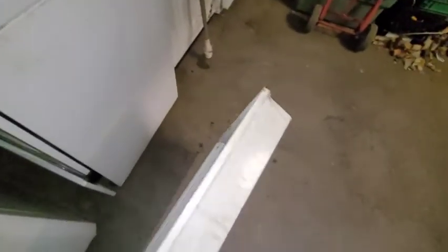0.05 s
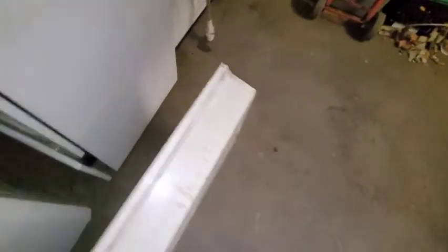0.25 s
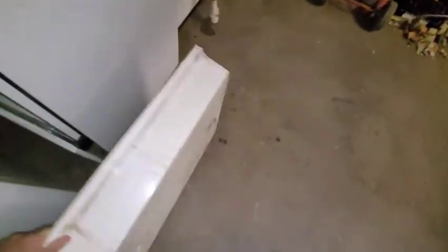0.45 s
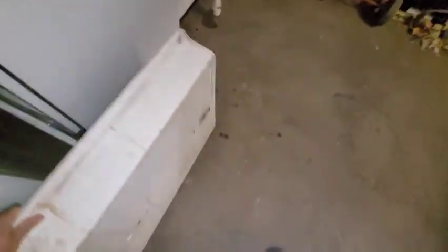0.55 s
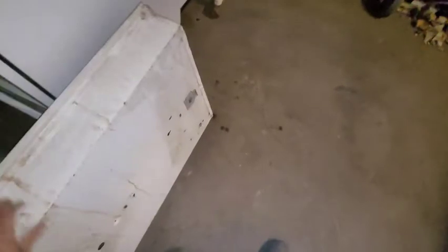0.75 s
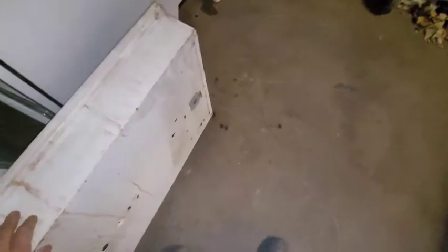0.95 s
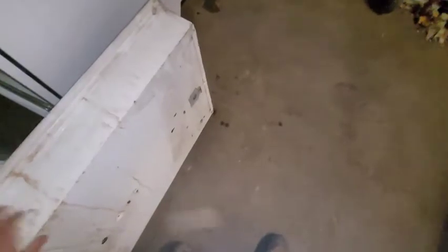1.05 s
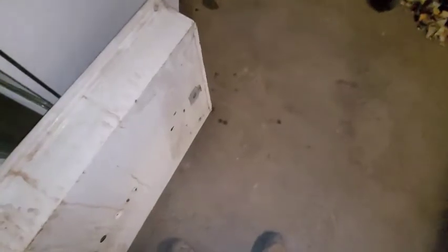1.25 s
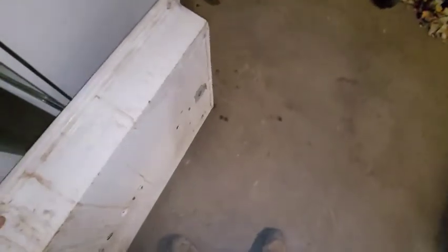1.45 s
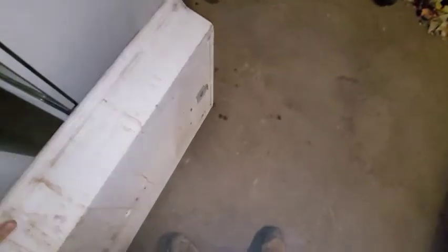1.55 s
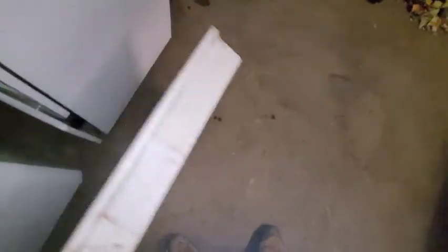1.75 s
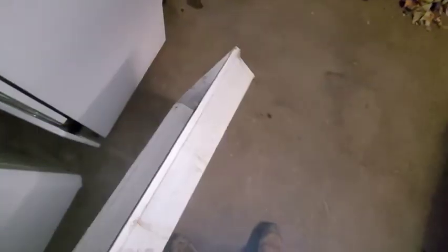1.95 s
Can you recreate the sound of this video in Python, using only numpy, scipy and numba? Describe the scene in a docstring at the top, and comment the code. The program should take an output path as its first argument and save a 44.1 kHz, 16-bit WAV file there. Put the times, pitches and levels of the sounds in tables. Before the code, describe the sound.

Close by in a reverberant garage, a big steel panel tips onto concrete with two loud, ringing bangs. Lighter knocks follow, then a thin metallic jingle, a gritty scrape and a last knock with a dull thump.

```python
"""Two loud, chattering bangs: a large folded sheet-steel panel tips onto a concrete garage floor nearby.
It rocks and knocks; each blow excites the bending modes of the sheet, which in turn fill the room.
A small loose metal part jingles, then the edge drags over grit and is knocked again, with one dull thump.
A gain control ducks the level under the big bangs."""
import sys
import numpy as np
from scipy import signal
from scipy.fft import rfft, irfft
from scipy.io import wavfile
from numba import njit

SR = 44100
rng = np.random.default_rng(int(sys.argv[2]) if len(sys.argv) > 2 else 0)


def wav_out(sig):
    """Save sig, one row per channel (or a flat mono array), as 16-bit PCM at SR to the path in sys.argv[1]."""
    wavfile.write(sys.argv[1], SR, np.round(np.clip(np.atleast_2d(sig).T, -1, 1) * 32767).astype(np.int16))


N = 88200
T = np.arange(N) / SR
FREQS = np.arange(N + 1) * SR / (2 * N)
GRIT_PER_S, GRIT_SCATTER_DB = 1500, 4.5
# Centres of the bands in which vibrational power is followed, in Hz.
BANDS_HZ = [40, 70, 140, 250, 420, 700, 1200, 2000, 3300, 5000, 8000, 13000, 16000]


def undb(db):
    """Decibels to amplitude ratio."""
    return 10 ** (np.asarray(db) / 20)


def at(points, hz):
    """Interpolation of (Hz, value) points on a log-frequency axis."""
    f, v = np.array(points, float).T
    return np.interp(np.log(np.maximum(hz, 1)), np.log(f), v)


def unit(x):
    """Normalisation to unit energy."""
    return x / np.sqrt(np.sum(x ** 2, axis=-1, keepdims=True) + 1e-18)


def convolve(x, response):
    """Convolution: x drives a linear system with this impulse response."""
    return irfft(rfft(x, 2 * N) * rfft(response, 2 * N))[..., :N]


def colour(x, points):
    """Minimum-phase filtering through (Hz, dB) points."""
    cepstrum = irfft(np.log(undb(at(points, FREQS))))[:N]
    cepstrum[1:] *= 2
    return irfft(rfft(x, 2 * N) * np.exp(rfft(cepstrum, 2 * N)))[..., :N]


def delay(x, s):
    """Pure delay of s seconds."""
    k = int(np.clip(s * SR, 0, N - 1))
    return np.concatenate([np.zeros(k), x[:N - k]])


def ring(modes):
    """Free vibration: a sum of damped sines, each of random sign."""
    signs = rng.choice([-1, 1], len(modes))
    return sum(sign * undb(db) * np.exp(-np.log(1000) * T / t60) * np.sin(2 * np.pi * hz * T)
               for sign, (hz, db, t60) in zip(signs, modes))


def clicks(per_s, scatter_db):
    """Poisson process: random contacts of uneven size, at rms 1."""
    impulses = (rng.random(N) < per_s / SR) * rng.choice([-1, 1], N)
    return unit(impulses * undb(scatter_db * rng.standard_normal(N))) * np.sqrt(N)


def store(power, t60):
    """Leaky integration: a resonator loses its stored energy exponentially."""
    retained = np.exp(-2 * np.log(1000) / (max(t60, .005) * SR))
    return signal.lfilter([1 - retained], [1, -retained], power)


def wash(power, t60s, echo_db):
    """Statistical energy flow: in each band, power feeds an object's dense modes, which feed the room."""
    # Garage reverberation. Each row: frequency in Hz, T60 in seconds.
    room_t60 = [(70, 1.44), (250, 1.24), (700, 1.19), (2000, 0.68), (6000, 0.23), (15000, 0.58)]
    # Likeness of the two channels. Each row: frequency in Hz, correlation.
    coherence = [(50, 0.28), (130, 1), (280, 1), (520, 1), (1000, 0.0082), (15000, 0.0081)]
    room_db = -1
    alike = np.clip(at(coherence, FREQS[::2]), 0, 1)
    mid, side = rfft(rng.standard_normal((2, N))) * np.sqrt(np.array([1 + alike, 1 - alike]) / 2)
    field, out = np.array([mid + side, mid - side]), 0
    for hz, share, fed in zip(BANDS_HZ, np.eye(len(BANDS_HZ)), power):
        own = store(fed + 1e-18, at(t60s, hz))
        echo = store(own, at(room_t60, hz)) * undb(room_db + at(echo_db, hz)) ** 2
        band_noise = irfft(field * at(list(zip(BANDS_HZ, share)), FREQS[::2]))
        out = out + band_noise * np.sqrt((own + echo) / 2)
    return out


def room_air(rms_db=-67.5):
    """Ambient noise: steady, strongest in the bass, uncorrelated between channels."""
    # Each row: frequency in Hz, relative level in dB.
    spectrum = [(30, -2), (120, -10), (400, -1), (900, -13), (2500, -19), (8000, -21), (15000, -19)]
    return unit(colour(rng.standard_normal((2, N)), spectrum)) * np.sqrt(N) * undb(rms_db)


def thump():
    """Heavy damping: a low oscillation dies within a few cycles."""
    # Each row: start in seconds, frequency in Hz, time constant in seconds, level in dB.
    pulses = [(1.896, 86, 0.0088, -24.5)]
    return sum(delay(undb(db) * np.sin(2 * np.pi * hz * T) * np.exp(-T / decay_s), s)
               for s, hz, decay_s, db in pulses)


def skids():
    """Sliding friction: the edge skids over grit in brief swells of hiss."""
    # Each row: start in seconds, length in seconds, level in dB.
    slides = [(0.531, 0.23, -40), (1.673, 0.081, -45.5)]
    # Each row: frequency in Hz, gain in dB.
    spectrum = [(3000, -14), (7000, -4), (12000, 4.5), (15500, 16)]
    swell = sum(undb(db) * np.sin(np.pi * np.clip((T - s) / length, 0, 1)) for s, length, db in slides)
    grit = np.array([clicks(GRIT_PER_S, GRIT_SCATTER_DB) for _ in range(2)])
    return swell * colour(grit, spectrum)


def loose_part(crack_db=-8.5, crack_decay_s=.006):
    """Impulse excitation: sharp ticks ring the high modes of a small piece of metal."""
    # Each row: start in seconds, level in dB.
    ticks = [(1.09, -20), (1.226, -19), (1.304, 1.5), (1.31, -2.5), (1.322, 3), (1.341, 2.5), (1.447, 5),
             (1.758, -4.5)]
    # Each row: frequency in Hz, level in dB, T60 in seconds.
    modes = [(10540, -50, .08), (11828, -39, .12), (14443, -36, .13), (15513, -25, .11)]
    # Spectrum of a tick. Each row: frequency in Hz, gain in dB.
    spectrum = [(500, -16.5), (1500, -5), (3000, -13), (5000, -3.5), (9000, -8.5), (15000, 9)]
    # Decay of the dense modes. Each row: frequency in Hz, T60 in seconds.
    t60s = [(2000, 0.26), (6000, 0.32), (14000, 0.14)]
    # Coupling to the room. Each row: frequency in Hz, gain in dB.
    echo_db = [(2000, 4), (6000, 3.5), (14000, -13.5)]
    strikes = sum(delay(undb(db) * (T == 0), s) for s, db in ticks)
    power = np.outer(undb(at(spectrum, BANDS_HZ)), strikes) ** 2
    burst = unit(rng.standard_normal((2, N)) * np.exp(-T / crack_decay_s))
    crack = colour(burst, spectrum) * undb(crack_db)
    return wash(power, t60s, echo_db) + convolve(strikes, crack + ring(modes))


def flange(detune=.006):
    """Modal ringing: the folded flange clanks as a corner lands, at slightly new pitches each time."""
    # Each row: start in seconds, level in dB.
    landings = [(.740, -0.5), (0.784, -5), (1.762, -9)]
    # Each row: frequency in Hz, level in dB, T60 in seconds.
    modes = [(1390, -32, .3), (1600, -30, .35), (2400, -30, .25), (2470, -26, .35), (2560, -31, .25),
             (2750, -29, .3), (2930, -32, .55), (3140, -32, .45), (4830, -40, .4)]
    out = 0
    for s, db in landings:
        detuned = [(hz * (1 + detune * rng.standard_normal()), level, t60) for hz, level, t60 in modes]
        out = out + undb(db) * np.array([delay(ring(detuned), s) for _ in range(2)])
    return out


def drag():
    """Roughness excitation: grit catches under the moving edge; gives force and band power."""
    # Each row: time in seconds, relative level in dB.
    levels = [(0, -47), (.1, -27.5), (.21, -15.5), (.6, 3.5), (1.0, -18), (1.25, -19), (1.42, -2.5),
              (1.56, -1.5), (1.66, -2), (1.72, 2.5), (1.82, -6), (1.92, -5), (2, 0)]
    # Each row: frequency in Hz, gain in dB.
    spectrum = [(70, -54.5), (250, -60), (700, -60), (2000, -56), (4200, -55), (6800, -58.5), (9000, -50.5),
                (15000, -73)]
    grit = clicks(GRIT_PER_S, GRIT_SCATTER_DB) * undb(np.interp(T, *np.array(levels).T))
    return colour(grit, spectrum), np.outer(undb(at(spectrum, BANDS_HZ)), grit) ** 2


def blows(first_contact=1.12):
    """Impact: one hard contact, then a dying chatter of loose edges; gives force and band power."""
    # Each row: start in seconds, chatter time constant in seconds, then force in dB at each of force_hz.
    impacts = [(.225, 0.0023, 1, 0.5, -1.5, 2, 3, 4.5), (.252, .005, 2.5, 4.5, 4.5, 0, -4, 2),
               (.304, 0.0036, -9, 8, -1, -2, -1, 3.5), (0.382, 0.013, 2.5, -30, -3, 7.5, 7, 8.5),
               (.422, 0.025, 6, -13.5, 3.5, -19, -16, -18), (.658, 0.011, 4, -4.5, -7.5, -10.5, -17, -11.5),
               (.739, 0.0017, 0, -12, -10.5, -1, -5, -6), (.795, .005, -15, -3, -20.5, -23.5, -59, -21),
               (.854, 0.0024, -5, -15, -8.5, -5.5, -14.5, -6.5),
               (1.040, 0.0058, -14.5, -40, -29, -27, -42, -40),
               (1.446, 0.0029, -41, -28, -12.5, -9, -7, -7.5),
               (1.762, 0.0055, -21, -23.5, -23, -14, -12, -20.5),
               (1.992, .002, -23, -14.5, -14, -10, -13, -23.5)]
    force_hz = [70, 250, 700, 2000, 5000, 13000]
    force, power = np.zeros(N), 0
    for s, chatter_s, *force_db in impacts:
        fade = np.exp(-T / chatter_s) + 1e-12
        spectrum = list(zip(force_hz, force_db))
        contact = unit(clicks(per_s=860, scatter_db=7.5) * fade)
        contact[0] += first_contact
        force += delay(colour(unit(contact), spectrum), s)
        power = power + np.outer(undb(at(spectrum, BANDS_HZ)) ** 2, delay(unit(fade) ** 2, s))
    return force, power


def partials(mean_spacing_hz=54.4, t60_s=.51):
    """Modal density: many weak modes at random pitches, each with its own phase in each channel."""
    # Each row: frequency in Hz, gain in dB.
    spectrum = [(250, -33), (500, -3), (2000, -4.5), (7000, -6), (12000, -12)]
    bins = N // 2 + 1
    present = rng.random(bins) < SR / N / mean_spacing_hz
    tones = irfft(present * np.exp(2j * np.pi * rng.random((2, bins))))
    return colour(unit(tones * np.exp(-np.log(1000) * T / t60_s)), spectrum)


def panel(contact_db=-17.5):
    """Superposition: blows and drag drive the sheet's dense, weak and strong modes; blows also crack."""
    # Broad response of the sheet. Each row: frequency in Hz, gain in dB.
    response = [(25, 2), (48, 20.5), (72, 25), (110, 23), (135, 24.5), (170, 30), (210, 35.5), (255, 32.5),
                (380, 36), (520, 27), (740, 28.5), (1000, 20.5), (1450, 25), (2000, 22), (2500, 22),
                (3000, 19), (3600, 17.5), (6500, 17), (11000, 13.5), (15500, 24)]
    # Decay of the dense modes. Each row: frequency in Hz, T60 in seconds.
    t60s = [(70, 0.46), (250, 0.76), (700, 0.66), (2000, 0.71), (6000, 0.6), (15000, 0.28)]
    # Coupling to the room. Each row: frequency in Hz, gain in dB.
    echo_db = [(70, -4.5), (250, 2), (2000, -1), (6000, -2), (15000, -3.5)]
    # Each row: frequency in Hz, level in dB, T60 in seconds.
    strong_modes = [(72, -43, .9), (207, -21, .55), (226, -28, 2.0), (285, -27, .6), (360, -28, .75),
                    (410, -33, .8), (612, -38, .8), (715, -34, .9), (1160, -41, .6), (1290, -41, .6),
                    (1600, -41, .6), (1806, -42, .6), (2293, -38, .7), (2482, -39, .6), (2930, -42, .7),
                    (4452, -41, .6), (4958, -42, .6), (6444, -40, .7)]
    hits, hit_power = blows()
    grit, grit_power = drag()
    force = hits + grit
    dense = wash(hit_power + grit_power, t60s, echo_db)
    crash = undb(contact_db) * hits + dense + convolve(force, partials())
    return colour(crash, response) + convolve(force, ring(strong_modes))


def scene(right_lag_s=.00038):
    """Stereo localisation: time and level differences place the sources off centre, over room air."""
    # The panel swings across the microphone. Each row: time in seconds, left minus right in dB.
    swing = [(.22, -1.8), (.45, -0.5), (.8, -.5), (1.3, 0), (1.55, -1), (1.8, 0), (2, 0.5)]
    # Each row: frequency in Hz, left minus right in dB.
    balance = [(100, 1), (250, -0.5), (600, -1), (1200, -4.5), (2800, -1.5), (5500, -2.5), (9000, 3.5),
               (14000, 0)]
    swing_db = np.interp(T, *np.array(swing).T) / 2
    metal = panel() + flange() + loose_part() + skids()
    left, right = metal * undb([swing_db, -swing_db]) + thump()
    stereo = np.array([left, delay(right, right_lag_s)])
    lean_db = at(balance, FREQS) / 2
    stereo = irfft(rfft(stereo, 2 * N) * undb([lean_db, -lean_db]))[:, :N]
    return stereo + room_air()


@njit
def follow(x, attack_s, release_s):
    """Envelope detection with separate time constants for rise and fall."""
    out, level = np.empty(len(x)), 0.
    for i in range(len(x)):
        level += (x[i] - level) / (SR * (attack_s if x[i] > level else release_s))
        out[i] = level
    return out


def record(dry, threshold_db=-1.98, ratio=1.3, cutoff_hz=15850):
    """Compression: after the microphone's notch, loud peaks duck the gain, saturate and are low-passed."""
    # Each row: frequency in Hz, gain in dB.
    mic_response = [(20, 1.5), (6900, -1), (7800, -6), (8700, -12), (10000, -5), (12000, -2),
                    (16000, -10.5)]
    x = colour(dry, mic_response)
    envelope = follow(np.abs(x).max(axis=0), attack_s=.0058, release_s=.32)
    gain = np.maximum(envelope / undb(threshold_db), 1) ** (1 / ratio - 1)
    low_pass = signal.ellip(10, .2, 70, cutoff_hz, fs=SR, output="sos")
    return signal.sosfilt(low_pass, np.tanh(x * gain))


dry = scene()
out = record(dry)
wav_out(out)
```